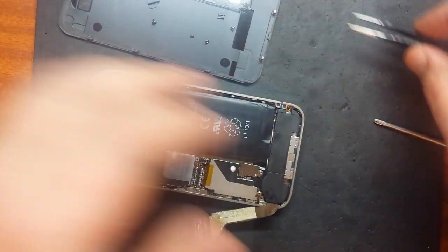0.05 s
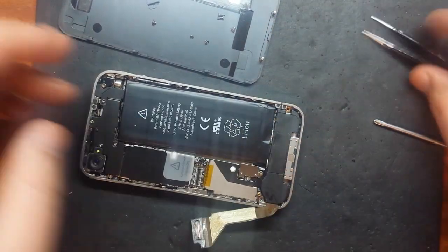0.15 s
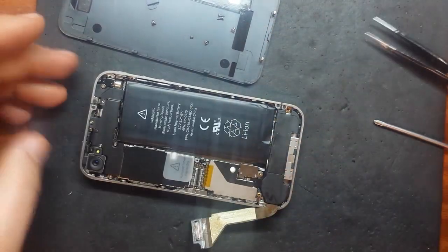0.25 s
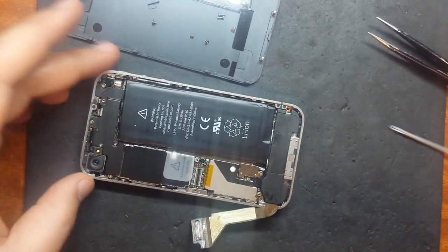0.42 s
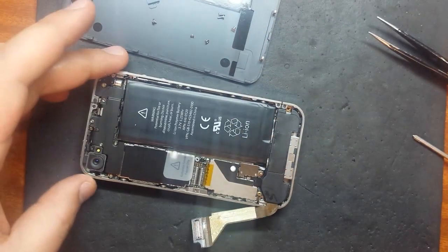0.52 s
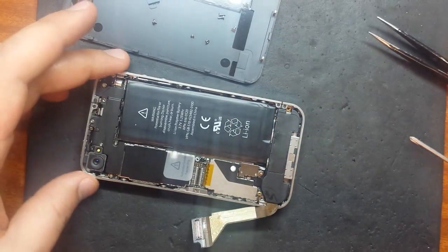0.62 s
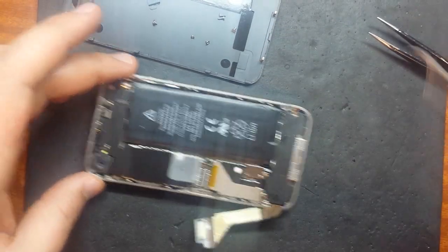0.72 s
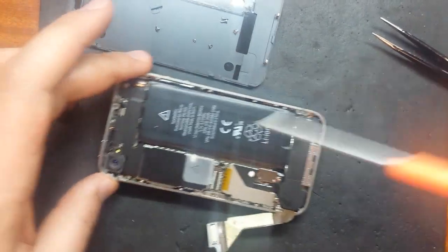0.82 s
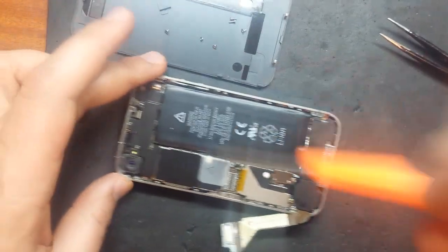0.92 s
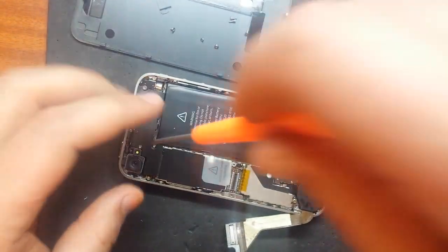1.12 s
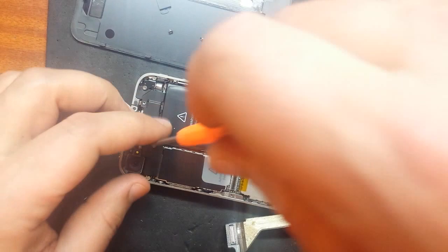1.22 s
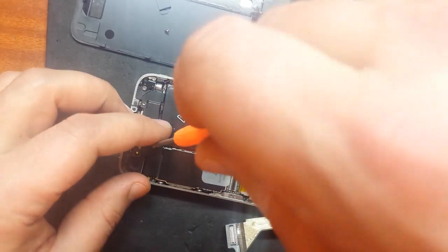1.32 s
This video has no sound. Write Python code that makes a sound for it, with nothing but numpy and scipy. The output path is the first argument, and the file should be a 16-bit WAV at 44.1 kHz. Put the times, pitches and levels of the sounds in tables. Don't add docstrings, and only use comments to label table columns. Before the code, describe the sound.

Steel tweezers land on a matted bench with a loud sharp clink, rattle through quickening, weakening bounces and ring thinly; later a tool ticks faintly and a hand thuds softly. Close stereo microphone, quiet humming room.

```python
import sys
import numpy as np
from scipy import signal
from scipy.io import wavfile

SR = 44100
rng = np.random.default_rng(int(sys.argv[2]) if len(sys.argv) > 2 else 0)


def natural_amplitude(level_db):
    exponent = np.asarray(level_db, float) / 20
    return 10 ** exponent


def unload_audio(sound):
    columns = np.transpose(np.atleast_2d(sound))
    steps = np.round(np.clip(columns, -1, 1) * 32767)
    wavfile.write(sys.argv[1], SR, steps.astype(np.int16))


N = 59535

# start_s [s], peak_db [dB], ring_db [dB], overtone_db [dB], crack_db [dB]
CONTACTS = [(0.2462, -1.5, -18, -18.5, -2.5), (0.3222, -10, -13, -34, -7.5),
            (0.3789, -14.5, -31.5, -32, -10.5), (0.4323, -18, -20, -39.5, -4),
            (0.4748, -20, -26, -104, -52), (0.5064, -25, -27.5, -49, -25), (0.524, -30, -28, -45.5, -15.5),
            (0.536, -34.5, -35, -55, -51), (0.546, -37.5, -37, -53, -51), (0.555, -34.5, -32, -54, -38.5),
            (0.567, -38.5, -55, -52, -47), (.572, -55, -40, -55, -47), (0.585, -47, -41, -55, -50),
            (0.596, -60, -55, -53, -52)]
LEFT_LAG = 2


def rms_one(x):
    return x / np.sqrt(np.mean(x ** 2) + 1e-20)


def at_hz(points, hz):
    table_hz, value = np.array(points).T
    return np.interp(np.log(hz), np.log(table_hz), value)


def pan(db):
    return natural_amplitude(np.array([[.5], [-.5]]) * db)


def since(s):
    return np.maximum(np.arange(N) / SR - s, 0)


def fall(t, t60):
    return 10 ** (-3 * t / t60)


def ring(x, hz, t60):
    r = fall(1 / SR, t60)
    w = 2 * np.pi * hz / SR
    return signal.lfilter([0, np.sin(w)], [1, -2 * r * np.cos(w), r * r], x + 1e-18)


def lowpass(x, order, hz):
    return signal.sosfilt(signal.butter(order, hz, fs=SR, output="sos"), x)


def drift(rate):
    r = np.exp(-80 * np.pi * rate / SR)
    white = rng.standard_normal(N // 40 + 2002)
    slow = signal.lfilter([1], [1, -2 * r, r * r], white)[2000:]
    return np.interp(np.arange(N) / 40, np.arange(len(slow)), rms_one(slow))


def banded_noise(spectrum, patchy_db, likeness):
    # pitch_hz [Hz], likeness [ratio]
    channel_likeness = [(60, 0.97), (180, 0.94), (540, -0.035), (1640, -0.12), (4940, -2.3), (14900, -0.01)]
    out = 0
    edges = 22 * 2 ** np.arange(0, 9.6, .5)
    white = rng.standard_normal((2, 2, N))
    for k, (low, high) in enumerate(zip(edges, edges[1:])):
        band = signal.butter(2, [low, high], "band", fs=SR, output="sos")
        mid, side = signal.sosfilt(band, white[k % 2])
        hz = np.sqrt(low * high)
        alike = np.clip(at_hz(channel_likeness, hz) * likeness, 0, 1)
        stereo = np.sqrt(1 + alike) * mid + np.sqrt(1 - alike) * side * [[1], [-1]]
        out = out + natural_amplitude(at_hz(spectrum, hz) + patchy_db * drift(31.0)) * stereo
    return rms_one(out)


def swells(rows, lr_db, lr_phase):
    out = 0
    for s, db, hz, length in rows:
        hump = np.sin(np.pi * np.minimum(since(s) / length, 1))
        out = out + natural_amplitude(db) * hump * np.sin(2 * np.pi * hz * since(s) + [[0], [lr_phase]])
    return pan(lr_db) * out


def room():
    # start_s [s], level_db [dB]
    gain_ride = [(0, -38.5), (0.098, -38), (.21, -39.5), (0.234, -38.5), (0.242, -53.5), (.26, -38.5),
                 (.4, -47.5), (.55, -54), (.68, -57), (.95, -56), (1.202, -55.5), (1.27, -52),
                 (1.35, -52.5)]
    # pitch_hz [Hz], density_db [dB per Hz]
    hiss = [(15, -72), (25, -54), (104, -10.5), (443, -13), (595, -10.5), (890, -10.5), (1740, -15.5),
            (5830, -21), (15300, -62)]
    # pitch_hz [Hz], width_hz [Hz], level_db [dB]
    hum_modes = [(59.7, 3.3, -14.5), (116.5, 3.3, -7.5), (140, 18, -8.5), (192, 31, -10.5),
                 (265, 8.7, -9.5), (283, 4, -14), (388.5, 60, -10), (934, 83, -10)]
    s, db = np.transpose(gain_ride)
    hum = 0
    for hz, width, level_db in hum_modes:
        wavering = ring(rng.standard_normal(N + 9000), hz, 2.2 / width)[9000:]
        hum = hum + natural_amplitude(level_db) * rms_one(wavering)
    level = natural_amplitude(np.interp(np.arange(N) / SR, s, db))
    floor = level * (banded_noise(hiss, patchy_db=2.0, likeness=1.0) + hum) * pan(2.3)
    floor[0] = np.roll(floor[0], -8)
    return floor


def thuds():
    # start_s [s], level_db [dB], pitch_hz [Hz], length_s [s]
    bench_humps = [
        (0.18, -46, 104.2, 0.08),
        (.085, -33.5, 140, 0.16),
        (0.5, -56, 98, 0.025),
        (0.15, -44, 255, .09),
        (1.8, -40, 115, .03),
        (1.258, -46.5, 297, 0.017),
        (1.25, -51.5, 422, 0.032),
        (1.28, -59, 250, 0.055),
        (1.32, -52, 90, .04),
        (1.29, -55, 170, 0.06),
    ]
    return swells(bench_humps, lr_db=0.8, lr_phase=0.061)


def knocks():
    # pitch_hz [Hz], level_db [dB], t60_s [s], left_right_db [dB]
    body_modes = [(516, -22, 0.029, -2.5), (715.6, -14, .04, -2.5), (1125.5, -10, 0.035, 1.5),
                  (1442, -3, 0.015, -5), (2326, 1.5, .022, 8), (2850, -7, 0.014, 1.5), (3610, 0, 0.014, 25),
                  (4226, 5.5, 0.025, 0.5), (4904, 4.5, .018, 0), (5500, -8, 0.03, 1),
                  (6102, 10.5, 0.0063, 8), (7380, -2, .01, 1), (7700, -9.5, .01, 3.5),
                  (11000, -9, 0.009, 1)]
    body_db, rattle_db, rattle_s = -8, -28, 0.0063
    bend_lag_s, strike_spread_db = .0024, 1.5
    crack_hz, crack_t60_s, edge_hz, edge_db = 4818, .001, 12000, -14.5

    start_s, strength, _, _, crack_db = np.transpose(CONTACTS)
    at = (start_s * SR).astype(int)
    grit = rng.standard_normal((3, N))
    grit = grit[0] + 1.1 * grit[1:]
    luck = rng.standard_normal((len(CONTACTS), len(body_modes)))

    blow, rattle = np.zeros((2, N + SR)), np.zeros((2, N + SR))
    for s, db in zip(start_s, strength):
        dying = (since(s) > 0) * np.exp(-since(s) / rattle_s)
        rattle[:, SR:] += natural_amplitude(db + rattle_db) * dying * grit

    body = 0
    for k, (hz, db, t60, lr_db) in enumerate(body_modes):
        lag = int(bend_lag_s * SR * max(np.sqrt(1000 / hz) - .45, 0) * 2)
        blow[:, SR + at] = natural_amplitude(strength + strike_spread_db * luck[:, k])
        push = np.array([np.roll(blow[0], LEFT_LAG), blow[1]]) + rattle
        mode = ring(push[:, SR - lag:SR - lag + N], hz, t60)
        body += (-1) ** k * natural_amplitude(db + body_db) * pan(lr_db) * mode

    click = np.zeros(N)
    click[at + 8] = natural_amplitude(crack_db)
    edge = natural_amplitude(edge_db) * ring(click, edge_hz, 2 * crack_t60_s)
    crack = np.diff(ring(click, crack_hz, crack_t60_s) + edge, prepend=0)
    crack = np.array([np.roll(crack, LEFT_LAG), crack]) * pan(6)
    return lowpass(body, 6, 9600) + crack


def arms():
    ring_hz, pair_hz, pair_db, overtone_hz = 4394, 4388, -12.5, 8853
    swell_s, choke_s = 0.0082, 0.0015
    ring_t60_s, overtone_t60_s, rest_t60_s = .45, 0.28, 0.16
    t, out = np.arange(N) / SR, np.zeros((2, N))
    ends = [contact[0] for contact in CONTACTS[1:]] + [N / SR]
    phases = rng.uniform(0, 2 * np.pi, len(CONTACTS))
    at_rest = fall(since(ends[-2] + 0.033), rest_t60_s)
    for (s, _, ring_db, over_db, _), end, phase in zip(CONTACTS, ends, phases):
        age = since(s)
        swell = 1 - np.exp(-(age / min(swell_s, (end - s) / 5)) ** 2)
        alive = swell * np.exp(-since(end) / choke_s) * at_rest
        main = np.sin(2 * np.pi * ring_hz * age + [[0], [1.1]])
        main = main - natural_amplitude(pair_db) * np.sin(2 * np.pi * pair_hz * age + [[0], [1.1]])
        overtone = np.sin(2 * np.pi * overtone_hz * t + phase + [[0], [1.6]])
        main = natural_amplitude(ring_db) * fall(age, ring_t60_s) * main
        overtone = natural_amplitude(over_db) * fall(age, overtone_t60_s) * overtone
        out += alive * (main + overtone)
    return out * pan(4.5)


def tail():
    # pitch_hz [Hz], density_db [dB per Hz]
    answer = [(180, -55), (300, -32), (412, -24.5), (3890, -15), (4450, -6.5), (5020, -21), (8390, -20),
              (9040, -25.5), (11000, -77), (14300, -99), (22000, -120)]
    rise_s, t60_s = 0.009, .16
    power = 0
    for s, db, *_ in CONTACTS:
        rise = 1 - np.exp(-since(s) / rise_s)
        power = power + natural_amplitude(2 * db) * rise * fall(since(s), t60_s / 2)
    noise = lowpass(banded_noise(answer, patchy_db=2.0, likeness=.6), 8, 9000)
    return natural_amplitude(-9) * np.sqrt(power) * noise * pan(5.5)


def claps():
    # start_s [s], level_db [dB], pitch_hz [Hz], length_s [s]
    arm_claps = [
        (.2605, -14.5, 4260, 0.0071),
        (.265, -10, 4380, 0.002),
        (.272, -6.5, 4406, .0045),
        (0.282, -26.5, 4350, .004),
    ]
    return swells(arm_claps, lr_db=4.5, lr_phase=1.0)


def pings():
    # start_s [s], level_db [dB], pitch_hz [Hz], length_s [s]
    tool_pings = [
        (.7978, -38, 5510, 0.0056),
        (.7982, -34, 6270, 0.0028),
        (.7985, -48, 3550, 0.0019),
        (.7985, -45, 4720, 0.0027),
    ]
    return swells(tool_pings, lr_db=14.0, lr_phase=1.0)


def taps():
    # start_s [s], level_db [dB], pitch_hz [Hz], t60_s [s], rustle_db [dB]
    touches = [
        (.799, -35.5, 3880, .003, -20),
        (.799, -48, 9300, 0.0022, -39),
        (.802, -40.5, 5410, 0.0039, -4.5),
        (.8465, -40, 3980, 0.0045, -18),
        (0.847, -49, 5900, 0.0033, -11),
        (.952, -49, 5500, 0.0024, 12),
        (1.2595, -50, 5500, 0.0028, -20),
    ]
    touch_s, rustle_s = 0.00084, 0.041
    out = 0
    for s, db, hz, t60, rustle_db in touches:
        t = since(s)
        shape = np.exp(-t / touch_s) + natural_amplitude(rustle_db) * np.exp(-t / rustle_s)
        noise = rng.standard_normal(N) + 0.65 * rng.standard_normal((2, N))
        hit = ring((t > 0) * shape * noise, hz, t60)
        out = out + natural_amplitude(db) * np.diff(hit, prepend=0) / np.abs(hit).max()
    return out * pan(2.6)


def scene():
    tweezers = knocks() + arms() + claps() + tail()
    tool = pings() + taps()
    return room() + thuds() + tweezers + tool


def low_pass(x):
    return signal.sosfilt(signal.butter(12, 15480, fs=SR, output="sos"), x)


def record(dry):
    x = dry / (1 + (dry / .9) ** 8) ** (1 / 8)
    x = signal.sosfilt(signal.butter(4, 52, "high", fs=SR, output="sos"), x)
    x = signal.sosfilt(signal.cheby2(10, 60, 15600, fs=SR, output="sos"), x)
    return low_pass(x)


dry = scene()
out = record(dry)
unload_audio(out)
```